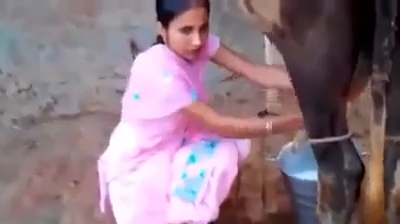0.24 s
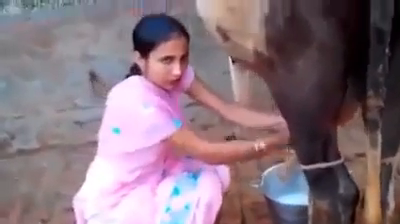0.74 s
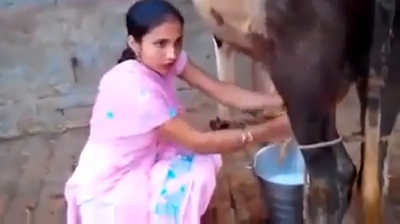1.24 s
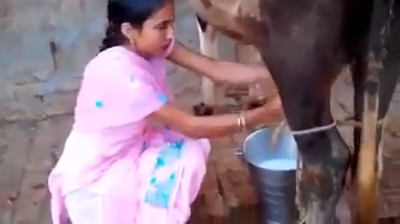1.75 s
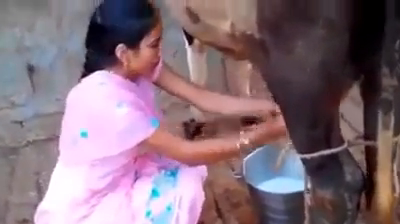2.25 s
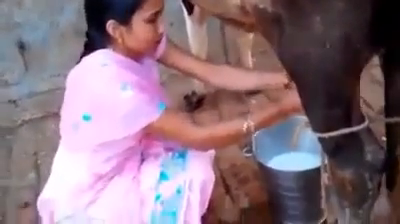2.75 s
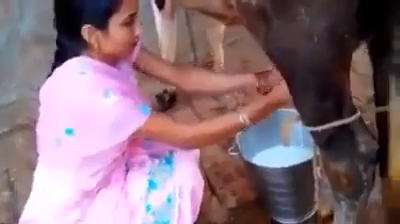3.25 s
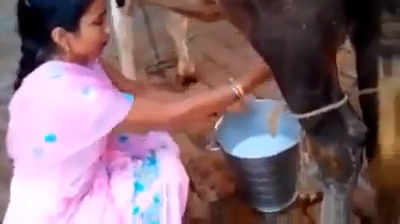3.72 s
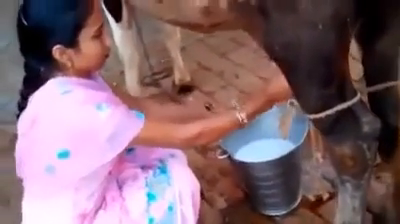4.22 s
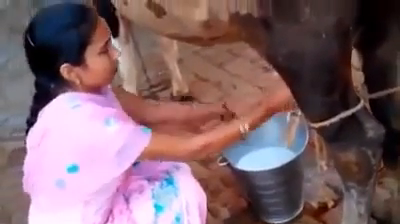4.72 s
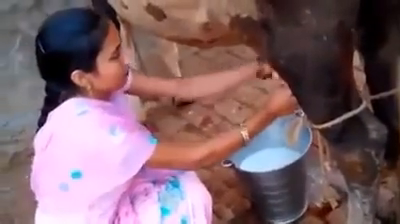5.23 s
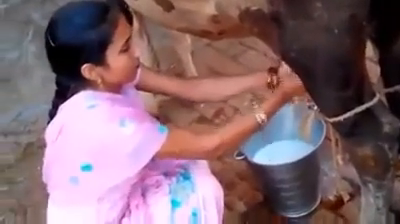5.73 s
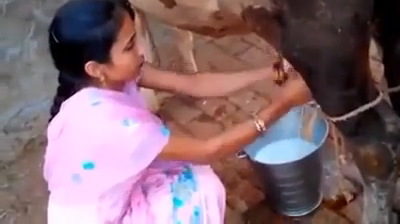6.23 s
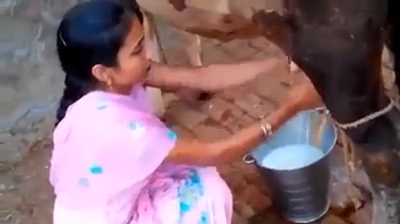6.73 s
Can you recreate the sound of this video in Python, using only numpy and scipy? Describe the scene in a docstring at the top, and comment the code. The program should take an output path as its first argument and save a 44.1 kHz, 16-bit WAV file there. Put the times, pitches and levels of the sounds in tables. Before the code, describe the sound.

Close by, milk jets strike a frothy, part-filled steel pail in uneven spurts, one or more a second. Each is a hissing, spattering burst with a low, hollow gurgle beneath, plus snapping drops and wet splats. One hard dry click falls early. Around the middle a stronger jet makes the metal wall ring, with a faint far whine. Last spurts are strongest. Soft outdoor hiss and low rumble; near, narrow-band stereo microphone, dull above 8 kHz.

```python
"""Milk hisses and spatters into froth as a cow is milked by hand in a yard, a step from a small two-port microphone.
Each jet is patchy noise with droplet grains; the air it traps gurgles low in the steel pail as unsteady tones.
Drops snap and gouts splat as decaying notes and noise bursts, a hard click falls once, and the bare wall
sings as resonant noise. Thin far tones come and go; a drone of narrow noise lies under the soft hiss of the yard."""
import sys
import numpy as np
from scipy import signal
from scipy.fft import rfft, irfft, next_fast_len
from scipy.io import wavfile
from scipy.ndimage import uniform_filter1d, map_coordinates

SR = 44100
rng = np.random.default_rng(int(sys.argv[2]) if len(sys.argv) > 2 else 0)


def nominal_scale(level):
    """Amplitude ratio for a level in decibels (scalar or array-like)."""
    x = np.asarray(level, float) / 20
    return 10 ** x


def generate_wav(signal):
    """Clip the signal to [-1, 1] and save it as 16-bit WAV at the path in sys.argv[1]."""
    frames = np.transpose(np.atleast_2d(signal))
    scaled = np.clip(frames, -1, 1) * 32767
    pcm = np.round(scaled).astype(np.int16)
    wavfile.write(sys.argv[1], SR, pcm)


N = 307377  # samples

# Levels in the tables are relative: each source applies its own trim.


def unit(x):
    """Normalisation: scaled to rms 1."""
    return x / np.sqrt(np.mean(x ** 2) + 1e-20)


def along(points, hz):
    """Interpolation of (Hz, value) points on a logarithmic frequency axis."""
    f, v = np.transpose(points)
    return np.interp(np.log(hz + 1), np.log(f + 1), v)


def curves(rows):
    """Linear interpolation in time: one value per sample for each column after the time."""
    s, *cols = np.transpose(rows)
    return [np.interp(np.arange(N) / SR, s, c) for c in cols]


def wobble(rate):
    """Slow random modulation: a smooth curve through `rate` random knots a second."""
    return map_coordinates(rng.standard_normal(int(N * rate / SR) + 4), [np.arange(N) * rate / SR])


def filtered(x, response):
    """Linear filtering: the spectrum of x times a complex response of frequency."""
    m = next_fast_len(N + 8192)
    return irfft(rfft(x, m) * response(np.fft.rfftfreq(m, 1 / SR)), m)[..., :N]


def coloured(x, spectrum):
    """Spectral shaping: x through (Hz, dB) points, then rms 1."""
    return unit(filtered(x, lambda hz: nominal_scale(along(spectrum, hz))))


def patchy(patchy_db, channels=1):
    """Non-stationary noise: channels share patches of random gain in time and frequency."""
    z = signal.stft(rng.standard_normal((channels, N)), nperseg=512)[2]
    field = rng.standard_normal(z.shape[1:])
    field = uniform_filter1d(field, size=3, axis=0)
    field = uniform_filter1d(field, size=9, axis=1)
    return signal.istft(z * nominal_scale(patchy_db * unit(field)), nperseg=512)[1][:, :N]


def bubbles(count, size, centre_hz, spread, cycles, rise, scatter_db):
    """Damped oscillators at random times: soft start, pitch creeping up as each bubble surfaces."""
    draw = rng.random((count, 2))
    start = (draw[:, 0] * N).astype(int)
    hz = (centre_hz[start] * np.exp(spread * rng.standard_normal(count)))[:, None]
    turns = hz * np.arange(size) / SR
    life = turns / cycles
    envelope = life * np.exp(-3 * life)
    wave = np.sin(2 * np.pi * turns * (1 + rise * np.minimum(life, 1))) * envelope
    wave *= nominal_scale(-scatter_db * np.log(draw[:, 1:] + 0.00081))  # a few grains far louder than the rest
    places = start[:, None] + np.arange(size)
    return unit(np.bincount(places.ravel(), wave.ravel(), N + size)[:N])


def ports(x):
    """Phase difference between receivers: the two ports hear the pail with a shift that varies with pitch."""
    # lead of the left port: hz, phase_rad
    lead = [(100, 0.33), (300, 0.5), (3200, -0.16), (4200, -1.5), (5400, -1.5), (6200, -2), (8000, -4)]
    sides = np.array([[1], [-1]])
    return filtered(x, lambda hz: np.exp(.5j * along(lead, hz) * sides))


def panned(left_right_db):
    """Intensity stereo: gains of the two channels for a level difference."""
    return nominal_scale([[left_right_db / 2], [-left_right_db / 2]])


def spread_out(noise, grains, spectrum, level_db, alike):
    """Partial coherence: grains and one noise come straight from the pail, two more as the walls scatter them."""
    late_grains = np.roll(grains, 300)  # samples
    paths = np.vstack([unit(noise[0] + grains), unit(noise[1:] + 0.4 * late_grains)])
    direct, *scattered = coloured(paths, spectrum) * nominal_scale(level_db)
    return np.sqrt(alike) * ports(direct) + np.sqrt(1 - alike) * np.array(scattered)


def surges(rows, levels_db, swell_db):
    """Exponential envelopes of power, one a row: a jump, a steady swell in dB to the peak, a steady fade."""
    jump_s, shortest_fade_s = 0.00788, .015  # the jump ends at the start time; lesser fades are lengthened
    t = np.arange(0, N, 128) / SR
    start, swell, fade = (np.asarray(rows)[:, k, None] for k in range(3))
    since = t - start
    growing_db = swell_db * (since / swell - 1)
    fading_db = -20 * (since - swell) / np.maximum(fade, shortest_fade_s)
    db = np.where(since < swell, growing_db, fading_db).clip(-99, 0)
    jump = np.clip(1 + since / jump_s, 0, 1)
    return t, nominal_scale(2 * (db + levels_db[:, None])) * jump ** 2


def loudness_db(rows, levels_db, swell_db, rest_db):
    """Incoherent addition: all surges and a constant floor summed as powers, in dB per sample."""
    t, power = surges(rows, levels_db, swell_db)
    return np.interp(np.arange(N) / SR, t, 10 * np.log10(power.sum(0) + nominal_scale(2 * rest_db)))


def resonance(f, centre_hz, width_hz, db):
    """Response of a damped resonator: a causal peak of the given height at its centre."""
    loss = 1j * f * width_hz
    return nominal_scale(db) * loss / (centre_hz * centre_hz - f * f + loss)


def yard():
    """Broadband ambience: soft hiss over a rumble that swells and sinks, with a wavering drone of narrow noise."""
    # spectrum heard in common by the two ports: hz, db_per_hz
    common = [(12, -41.5), (20, -21), (38, -9), (77, 0), (108, 3), (207, -9.5), (279, -9), (395, -12),
              (482, -17.5), (1040, -29.5), (2040, -24), (2680, -24), (4510, -25), (5500, -28), (6500, -32),
              (7600, -38), (7850, -62), (9880, -76), (16700, -120)]
    # spectrum heard in opposition by the two ports: hz, db_per_hz
    opposed = [(12, -32.5), (20, -13.5), (48, -13), (98, -7), (158, -13), (281, -8.5), (478, -15),
               (1310, -22), (1960, -21.5), (2280, -20), (4490, -13.5), (7250, -20.5), (8220, -26),
               (10700, -58), (18100, -120)]
    # level of the rumble and drone: time_s, level_db
    rumble_level = [(0, 0), (0.6, 0.5), (1.5, 1), (2.3, 1), (2.8, -0.5), (3.3, 1.5), (3.8, -3), (4.3, 2),
                    (4.8, -1), (5.2, 0), (5.7, -1.5), (6.2, -0.5), (6.6, -0.5), (6.97, -2)]
    drone = [(55, -30), (82, -3.5), (93, 1.0), (106, -4.5), (150, -31), (300, -89)]  # hz, db_per_hz
    mid = nominal_scale(-50 + 0.85 * wobble(3.374)) * coloured(patchy(2.14)[0], common)
    side = nominal_scale(-57.5) * coloured(patchy(1.3)[0], opposed)
    hum = nominal_scale(-57 + 0.57 * wobble(6.0)) * coloured(rng.standard_normal(N), drone)
    low = filtered(mid, lambda hz: 1 / (1 + (hz / 220) ** 4))
    rumble = (low + hum) * nominal_scale(curves(rumble_level)[0])
    hiss = mid - low
    return np.array([hiss + side, hiss - side]) + ports(rumble)


def jets():
    """Turbulent break-up: a fine spray of droplets over a coarser splash; both sputter as the jet breaks up."""
    # surges of the jet, several to one squirt:
    # start_s, swell_s, fade_s (for 20 dB), spray_db, mist_over_spray_db, splash_db
    jet_surges = [(0.047, 0.042, 0.34, -58.5, -12.5, -54.5), (0.118, 0.018, 0.08, -56.5, -14.5, -59),
                  (0.297, 0.017, 0, -60, -6, -57), (0.454, 0.12, 0.12, -52, -7, -51.5),
                  (0.796, 0.093, 0.22, -56.5, -13, -55.5), (0.964, 0.074, 0.1, -60, -19.5, -59),
                  (1.189, 0.12, 0.1, -55, -7, -53.5), (1.375, 0.024, 0.1, -59, -3.5, -54),
                  (1.528, 0.1, 0.25, -58.5, -10, -56.5), (1.617, 0.095, 0.24, -56, -24, -55),
                  (1.942, 0.0092, 0, -52.5, -6, -53.5), (1.967, 0.075, 0.1, -55, -9.5, -52.5),
                  (2.142, 0.012, -0.04, -52.5, -24, -49), (2.238, 0.042, 0.06, -59.5, -8, -52.5),
                  (2.279, 0.062, 0.52, -57, -8, -53.5), (2.499, 0.14, 0.23, -52, -7.5, -65.5),
                  (2.717, 0.038, 0.16, -57.5, -9, -52), (3.044, 0.095, 0.28, -56.5, -9, -54.5),
                  (3.121, 0.0063, 0, -68, -8, -46), (3.405, 0.0097, 0, -54.5, -10.5, -64),
                  (3.451, 0.024, 0.18, -55.5, -5.5, -61), (3.504, 0.032, 0.27, -52.5, -14, -52.5),
                  (4.092, 0.07, -0.07, -51, -8, -61), (4.202, 0.11, 0.22, -49.5, -11.5, -50.5),
                  (4.566, 0.097, 0.27, -52, -19, -58.5), (4.986, 0.036, 0.32, -51.5, -12, -57.5),
                  (5.052, 0.041, 0.43, -59, -9, -56.5), (5.839, 0.053, 0.18, -51.5, -9, -56),
                  (5.902, 0.057, 0.04, -45, -11, -46), (6.202, 0.13, 0.15, -49, -13.5, -52),
                  (6.27, 0.026, -0.02, -63, -16, -45.5), (6.348, 0.086, -0.4, -58.5, -17, -54.5),
                  (6.589, 0.11, 0.21, -47, -9, -50), (6.719, 0.026, -0.27, -45, -14.5, -62)]
    # colour of the spray: hz, db_per_hz
    spray_colour = [(1500, -24.5), (2600, -9), (3400, -4), (3850, -2), (4050, 0), (4300, 2.5), (4750, -0.5),
                    (5250, 0.5), (5550, -5.5), (6500, -16), (7200, -30.5)]
    # colour of the finest droplets: hz, db_per_hz
    mist_colour = [(5000, -21.5), (5800, -1.5), (6500, -2), (7300, 4), (8100, -12), (8500, -37.5)]
    # colour of the splash: hz, db_per_hz
    splash_colour = [(300, -26.5), (550, 2), (900, -3.5), (1400, -4.5), (1900, 0.5), (2500, -3.5),
                     (3500, -22)]
    spray_swell_db, splash_swell_db = 8.5, 13
    spray_peak, mist_over, splash_peak = np.transpose(jet_surges)[3:]
    # the last argument is the steady dribble under the surges
    spray_db = loudness_db(jet_surges, spray_peak, spray_swell_db, -73.5)
    mist_db = loudness_db(jet_surges, spray_peak + mist_over, spray_swell_db, -88)
    splash_db = loudness_db(jet_surges, splash_peak, splash_swell_db, -72.5)
    flat, sputter = np.ones(N), wobble(45)

    fizz = bubbles(count=10000, size=200, centre_hz=4500 * flat, spread=.33, cycles=8, rise=.05, scatter_db=2.3)
    spray_db = spray_db + 2.5 + 1.8 * sputter + 1.0 * wobble(140)
    spray = spread_out(patchy(3.2, channels=3), 0.76 * fizz, spray_colour, spray_db, alike=0.47)
    mist_db = mist_db + 8.0 + 2.3 * sputter
    mist = spread_out(patchy(5.2, channels=3), 0.14 * fizz, mist_colour, mist_db, alike=0.87)

    plips = bubbles(count=6000, size=400, centre_hz=1300 * flat, spread=.55, cycles=3, rise=.1, scatter_db=2.1)
    splash_db = splash_db + 0.091 + 1.5 * sputter
    splash = spread_out(patchy(4.2, channels=3), 0.52 * plips, splash_colour, splash_db, alike=0.8)
    return (spray + mist) * panned(-1.8) + splash


def gurgle():
    """Bubble resonance: the air pocket under the jet hums unsteadily, over churning milk and loose bubbles."""
    # surges of air dragged under: start_s, swell_s, fade_s (for 20 dB), level_db, pocket_pitch_hz
    gurgles = [(0.125, 0.019, 0.08, -44, 208.0), (0.184, 0.077, 0.33, -50, 211.8),
               (0.418, 0.2593, 0.14, -48.5, 224.7), (0.801, 0.16, -0.03, -47.5, 208.3),
               (0.962, 0.09, -0.1, -48, 204.0), (1.141, 0.0085, 0.42, -52, 195.2),
               (1.251, 0.042, 0.1, -45.0, 238.0), (1.353, 0.0772, 0, -44, 252.0),
               (1.588, 0.032, -0.08, -48.5, 232.4), (1.686, 0.1, -0.02, -43.5, 214.4),
               (1.936, 0.016, 0.18, -50.5, 215.8), (1.991, 0.043, -0.06, -48.5, 238.0),
               (2.138, 0.02, -0.44, -46.5, 257.7), (2.292, 0.11, 0.32, -47.5, 212.0),
               (2.684, 0.21, 0, -47.5, 260.3), (3.058, 0.015, 0.3, -58, 200.0),
               (3.109, 0.0595, 0.17, -45, 240.2), (3.436, 0.023, 0.3, -49, 196.9),
               (3.539, 0.025, -0.1, -44, 253), (3.58, 0.1205, 0, -45, 229.5),
               (3.929, 0.0084, -0.1, -52, 194), (4.109, 0.1206, 0.44, -46.0, 300.0),
               (4.26, 0.11, 0.02, -39.5, 267.8), (4.565, 0.17, 0.13, -46.0, 290.0),
               (4.819, 0.0094, 0.12, -54, 313.0), (4.983, 0.014, 0.08, -50.0, 260.0),
               (5.097, 0.02, 0.22, -44, 284.2), (5.894, 0.0787, 0.16, -46.5, 281.0),
               (6.2, 0.0098, 0.4, -51.5, 190.5), (6.271, 0.039, 0, -35.5, 302.0),
               (6.364, 0.067, 0.06, -44.5, 300), (6.581, 0.12, -0.4, -51.5, 271.3),
               (6.684, 0.034, 0.13, -38.5, 213.0), (6.829, 0.099, 0.5, -51.5, 250.0)]
    swell_db, froth_db, froth_hz = 7.5, -61, 208  # the froth is a steady floor with a pitch of its own
    middle_hz, tilt_db = 250, 4.5  # a higher pocket tilts the churn brighter, dB per octave
    churn = [(110, -39.0), (170, 2.3), (300, -4.5), (430, -1.5), (520, -17.5), (800, -14.5),
             (1200, -35.5)]  # hz, db_per_hz
    peak_db, pitch_hz = np.transpose(gurgles)[3:]
    level_db = loudness_db(gurgles, peak_db, swell_db, froth_db)

    # pitch is the power-weighted mean of all pockets and the froth
    t, power = surges(gurgles, peak_db, swell_db)
    rest = nominal_scale(2 * froth_db)
    mean_hz = (pitch_hz @ power + froth_hz * rest) / (power.sum(0) + rest)
    pocket_hz = np.interp(np.arange(N) / SR, t, mean_hz)
    shaky = wobble(28) + 1j * wobble(28) + 1.2  # random amplitude and phase
    hum = unit((shaky * np.exp(2j * np.pi * np.cumsum(pocket_hz) / SR)).real)

    glugs = bubbles(count=1500, size=2500, centre_hz=1.15 * pocket_hz, spread=.25, cycles=7, rise=.06, scatter_db=2)
    milk = spread_out(patchy(3.6, channels=3), 0.34 * glugs, churn, level_db - 3.0, alike=0.92)
    deep = filtered(milk, lambda hz: 1 / (1 + (hz / middle_hz) ** 6))
    tilt = nominal_scale(tilt_db * np.log2(pocket_hz / middle_hz))
    milk = deep / tilt + (milk - deep) * tilt
    return (milk + nominal_scale(level_db - 3.5) * hum) * panned(-1.8)


def snaps():
    """Impact transients: each drop is a sharp crack with a short note, over a duller slap."""
    # drops: start_s, peak_db, pitch_hz, left_right_db, slap_over_crack_db
    drops = [(0.126, -32.5, 955, -6, -3.5), (0.319, -39.5, 4040, 5, -21), (0.572, -34, 7550, -12, -33),
             (0.872, -32.5, 840, -3, -5), (1.036, -39, 4160, -2, -8), (1.245, -44, 4500, -2, -20),
             (1.278, -26.5, 1075, -1, -13), (1.62, -38.5, 3900, 3, -1.5), (1.946, -41.5, 4260, -5.5, -10),
             (2.03, -30.5, 4960, -3, -8.5), (2.146, -29.5, 980, 1, -11), (2.244, -40, 1542, -9, -18),
             (2.408, -29, 1950, -7, -21.5), (2.4108, -21, 1940, -6, -23), (3.127, -34, 1920, -2.5, -3),
             (3.41, -40.5, 1940, -3, -22), (3.463, -41, 4590, -0.5, -15), (3.545, -36, 3540, 7, -20),
             (4.058, -49, 3574, -4, 2), (4.313, -30, 3990, -1, -14), (4.847, -29, 4730, -7, -35),
             (4.851, -32, 1994, 0, -29), (4.993, -30, 4900, -2, -28), (5.018, -34.5, 5003, -6, -26),
             (5.836, -37.5, 817, 1.5, -11), (6.209, -38, 4668, -2.5, -26), (6.285, -27.5, 1248, 1, -2.5)]
    t60_at_1khz_s, shortens = 0.019, 0.1  # higher drops die sooner by this power of pitch
    rise_s, slap_t60_s = .0002, 0.035
    crack_grows, crack_even_db = 0.32, -28.5  # louder drops are more crack: dB per dB about this level
    crack_colour = [(500, -24.5), (900, -4.0), (5500, 5.5), (7400, 0.5), (8200, -10.0)]  # hz, gain_db
    slap_colour = [(300, -22.0), (550, 6.5), (1500, -1.5), (2500, -33.5)]  # hz, gain_db
    out, slaps, t = np.zeros((2, N + SR)), np.zeros(N + SR), np.arange(SR // 10) / SR
    noises = rng.standard_normal((len(drops), 2, len(t)))
    for (s, db, hz, pan_db, slap_db), (crack, slap) in zip(drops, noises):
        t60 = t60_at_1khz_s * (hz / 1000) ** -shortens
        crack_gain = (0.43 + hz / 5200) * nominal_scale(crack_grows * (db - crack_even_db))
        note = np.sin(2 * np.pi * hz * t) + crack_gain * crack
        shape = nominal_scale(db - 5.5 - 60 * t / t60) * (1 - np.exp(-t / rise_s))
        begin = round((s + .0004) * SR)  # just after the slap
        out[:, begin:][:, :len(t)] += shape * note * panned(pan_db)
        slaps[round(s * SR):][:len(t)] += nominal_scale(db + slap_db + 6.5 - 60 * t / slap_t60_s) * slap
    out = filtered(out[:, :N], lambda hz: nominal_scale(along(crack_colour, hz)))
    return ports(out) + filtered(slaps[:N], lambda hz: nominal_scale(along(slap_colour, hz)))


def splats():
    """Band-limited bursts: each gout of milk lands as noise around its own pitch, quick to rise, with a short tail."""
    # broken-off gouts landing: start_s, peak_db, centre_hz, left_right_db, hold_s
    gouts = [(0.126, -37.5, 3900, -2, 0.01), (0.457, -45, 4000, -4, 0.0056), (2.02, -40.5, 1200, 0, 0.014),
             (2.029, -35, 4740, 3, 0.0049), (2.148, -42, 4150, 0, .004), (2.272, -42, 1520, -5, 0.0054),
             (2.324, -43.5, 2120, 0, .005), (2.334, -44, 795, -1, .015), (2.738, -46.5, 2130, -2, 0.0035),
             (3.049, -43, 4640, -1, 0.011), (3.061, -53.5, 2000, -4, 0.033), (3.149, -43, 1990, -3, 0.0056),
             (4.135, -31, 4464, -9, 0.0056), (4.208, -36, 5800, -8, 0.0046), (4.23, -37, 4500, -4, 0.0054),
             (4.278, -37.5, 1290, -4, 0.009), (4.335, -39.5, 1500, -3, 0.022),
             (4.277, -35.5, 4500, -8, .004), (4.391, -31.5, 3730, -1.5, 0.0024),
             (4.402, -40.5, 1490, -3, 0.0099), (5.175, -47.5, 690, -2, 0.022),
             (5.229, -41.5, 5007, -4, 0.0071), (5.23, -45.5, 1900, -1, 0.005),
             (5.28, -49.5, 710, 3, 0.0096), (5.928, -48, 1100, 3, .006), (5.94, -37, 1712, -1, 0.0082),
             (6.304, -41, 1240, 2, 0.0099), (6.307, -38, 4600, -2, .01), (6.593, -37.5, 4710, -12, 0.0078),
             (6.673, -31.5, 4865, -5, .008), (6.705, -37, 4500, -4, 0.0051),
             (6.787, -41.5, 4500, -2, 0.0091), (6.851, -44, 4990, -5, 0.0075), (6.91, -48, 2500, -4, .006)]
    width_octaves, tail_t60_s, rise_s = 0.41, 0.02, 0.00059
    out, t = np.zeros((2, N + SR)), np.arange(SR // 10) / SR
    f = np.fft.rfftfreq(len(t), 1 / SR) + 1
    noises = rng.standard_normal((len(gouts), len(t)))
    for (s, db, hz, pan_db, hold_s), noise in zip(gouts, noises):
        band = 1 / (1 + (np.log2(f / hz) / width_octaves) ** 4)
        burst = unit(irfft(rfft(noise) * band, len(t)))
        tail_db = -60 * np.maximum(t - hold_s, 0) / tail_t60_s
        shape = nominal_scale(db - 8.5 + tail_db) * (1 - np.exp(-t / rise_s))
        out[:, round(s * SR):][:, :len(t)] += burst * shape * panned(pan_db)
    return ports(out[:, :N])


def gulps():
    """Volume pulsation of trapped air: a pocket closes, swells and rings a few cycles at its own pitch."""
    # big air pockets closing: start_s, peak_db, pitch_hz, t60_s
    pockets = [(0.132, -28, 196, 0.06), (0.224, -33.5, 195, 0.091), (0.299, -34, 196, 0.066),
               (1.032, -32, 186, 0.1), (1.289, -19.5, 255, 0.045), (1.362, -36.5, 253.5, 0.19),
               (2.03, -23.5, 250, 0.054), (2.147, -34.5, 270, 0.12), (2.408, -36.5, 190, 0.064),
               (2.879, -33.5, 271, 0.06), (3.048, -34, 197, .03), (3.119, -32, 261, 0.054),
               (3.158, -28, 250, 0.067), (3.596, -23, 252, 0.041), (3.69, -29, 209.2, 0.063),
               (4.133, -31, 277, 0.055), (4.239, -26.5, 312, 0.059), (4.67, -23, 322, 0.062),
               (4.85, -27, 405, 0.033), (4.99, -32.5, 410, 0.053), (5.113, -33, 387.3, 0.06),
               (5.174, -28.5, 286, 0.059), (6.285, -24, 330, 0.045), (6.302, -24, 322, 0.067),
               (6.33, -26.5, 306.3, 0.085), (6.366, -29, 312, 0.097), (6.41, -21.5, 296, 0.1)]
    swell_s = 0.0044
    out, t = np.zeros(N + SR), np.arange(SR // 5) / SR
    for s, db, hz, t60 in pockets:
        shape = nominal_scale(db - 1.5 - 60 * t / t60) * (1 - np.exp(-t / swell_s))
        out[round(s * SR):][:len(t)] += shape * np.sin(2 * np.pi * hz * t)
    return out[:N] * panned(-1.8)


def clicks():
    """Impulse response: a hard, dry click close by, one blow and a brief rattle through broad, dead resonances."""
    # blows: start_s, force_db, left_right_db
    blows = [(1.32135, -6, 8)]
    # resonances of the struck body: hz, width_hz, level_db
    body = [(1000, 1500, -12), (3300, 1600, -2), (5100, 600, 9), (6900, 1100, -1)]
    rattle_db, rattle_t60_s = -24, .012
    out, t = np.zeros((2, N + SR)), np.arange(SR // 50) / SR
    for s, db, pan_db in blows:
        rattle = nominal_scale(rattle_db - 60 * t / rattle_t60_s) * rng.standard_normal(len(t))
        blow = rattle + (t == 0)
        out[:, round(s * SR):][:, :len(t)] += nominal_scale(db) * blow * panned(pan_db)
    return ports(filtered(out[:, :N], lambda f: sum(resonance(f, *peak) for peak in body)))


def whine():
    """Additive synthesis: a faint far whine of thin partials that swell together, each flickering on its own."""
    # level of the whole: time_s, level_db
    whine_level = [(3.5, -93), (3.54, -58), (3.64, -68), (3.8, -69), (3.9, -68), (4.02, -63), (4.08, -79),
                   (4.13, -65.5), (4.6, -63), (4.66, -67), (4.95, -70.5), (5.0, -88)]
    # partials: pitch_hz, level_db
    partials = [(1080, -12.5), (2200, -5), (3035, 0.5), (3330, -4)]
    t = np.arange(N) / SR
    tones = np.zeros(N)
    for hz, db in partials:
        tones += nominal_scale(db + 1.7 * wobble(22)) * np.sin(2 * np.pi * hz * t + 0.7 * wobble(30))
    return nominal_scale(curves(whine_level)[0] + 0.3) * tones * panned(-6)


def wall():
    """Forced resonance: the jet's hiss sings in the bare steel wall; the spot struck sets the balance of modes."""
    # the jet strikes the wall and slides down it: time_s, level_db, spot (0 high on the wall, 1 low)
    strikes = [(4.08, -89, 0.16), (4.12, -46.5, 0), (4.19, -47, 0.09), (4.25, -48, 0.93), (4.39, -53, .9),
               (4.43, -68, .5), (4.6, -57, 0.69), (4.67, -45, 0.69), (4.8, -73, .5)]
    # modes of the wall: hz, width_hz (before squaring), struck_high_db, struck_low_db
    modes = [(1480, 150, -12.5, -1), (1900, 210, 1, -5.5), (2185, 390, -5.5, -3), (3040, 200, -5.5, -7),
             (4320, 370, -4.5, -2.5), (4500, 200, -3, -3.5), (5780, 220, -3.5, 0.5)]
    between_db = -14  # hiss that fills the gaps between the resonances
    level_db, low = curves(strikes)
    hiss, low = patchy(2.8)[0], low.clip(0, 1)

    def ring(column):
        """Modal sum: the hiss through squared resonances, weighted for one striking spot."""
        def response(f):
            peaks = sum(nominal_scale(mode[column]) * resonance(f, *mode[:2], 0) ** 2 for mode in modes)
            return peaks + nominal_scale(between_db) * resonance(f, 3500, 4500, 0.0017) ** 2
        return unit(filtered(hiss, response))

    return nominal_scale(level_db) * ports((1 - low) * ring(column=2) + low * ring(column=3))


def whistle():
    """Frequency modulation: a thin, unsteady far tone with a weaker one an octave below."""
    # course of the tone: time_s, pitch_hz, level_db
    course = [(5.43, 1930, -89.5), (5.47, 1942, -61), (5.54, 1900, -59), (5.575, 1900, -64),
              (5.6, 1870, -57), (5.69, 1890, -59), (5.77, 1916, -69), (5.82, 1870, -93)]
    hz, db = curves(course)
    phase = 2 * np.pi * np.cumsum(hz + 18 * wobble(60)) / SR
    return nominal_scale(db - 6 + 3 * wobble(40)) * (np.sin(phase) + 0.5 * np.sin(phase / 2))


def scene():
    """Superposition of all sources."""
    milk = jets() + gurgle() + snaps() + splats() + gulps() + wall()
    return yard() + milk + clicks() + whine() + whistle()


def top_cut(x):
    """Nothing passes above the cut-off."""
    return signal.sosfilt(signal.butter(12, 8370, fs=SR, output="sos"), x)


def record(dry):
    """Band limitation: a narrow-band recorder passes little above 8 kHz."""
    band_edge = [(7900, -0.5), (8250, -16.5), (8450, -74.5)]  # hz, gain_db
    mix = filtered(dry, lambda hz: nominal_scale(along(band_edge, hz)))
    return top_cut(mix)


dry = scene()
out = record(dry)
generate_wav(out)
```